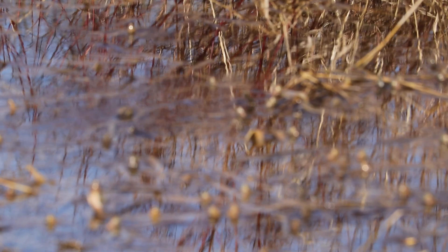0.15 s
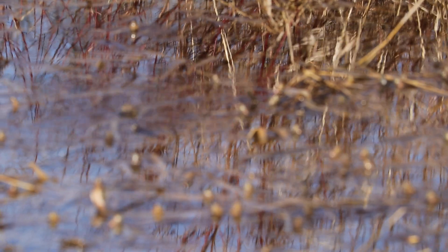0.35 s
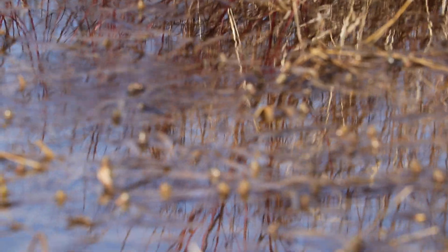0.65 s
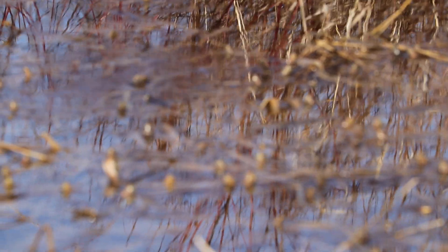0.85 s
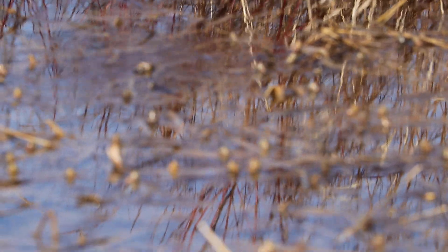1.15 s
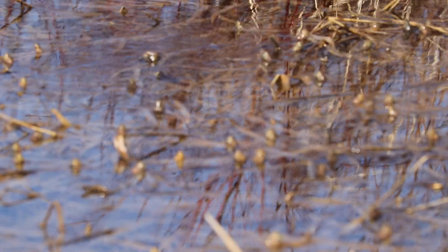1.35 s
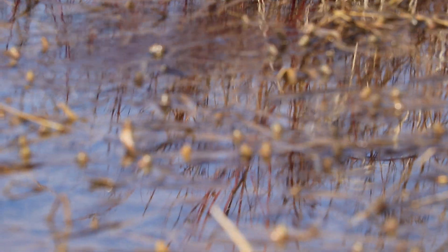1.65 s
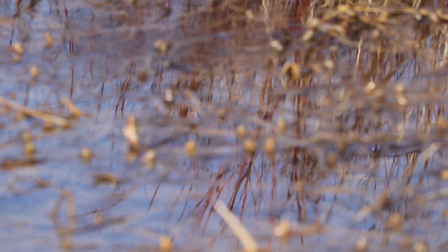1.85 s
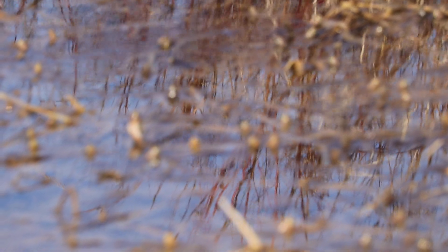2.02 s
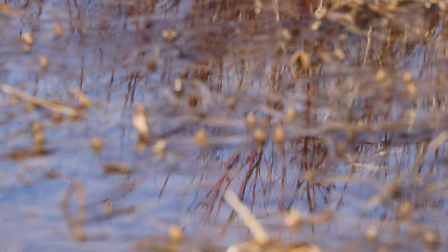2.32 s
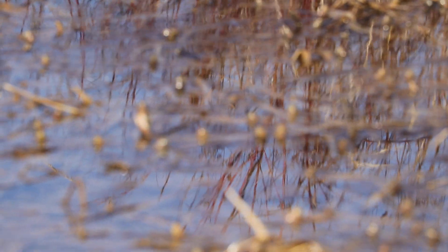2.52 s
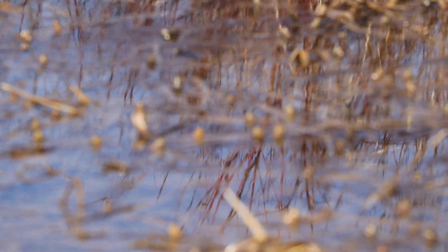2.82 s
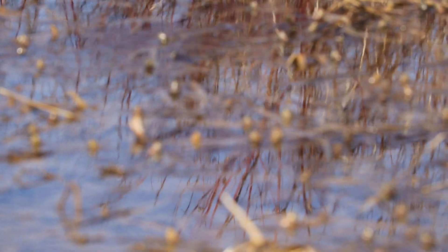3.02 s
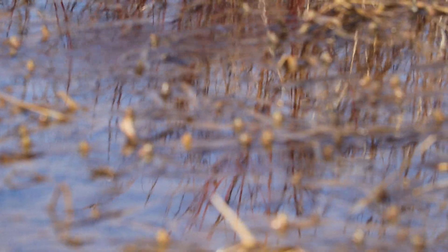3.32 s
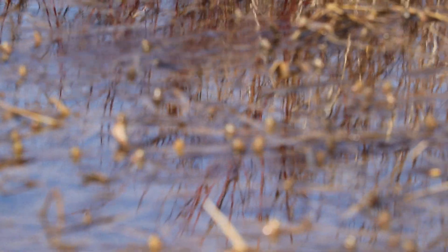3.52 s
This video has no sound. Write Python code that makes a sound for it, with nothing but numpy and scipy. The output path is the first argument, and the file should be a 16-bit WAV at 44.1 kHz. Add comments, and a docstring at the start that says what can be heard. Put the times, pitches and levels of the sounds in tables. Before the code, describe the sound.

A dense chorus of small frogs fills a shallow pond without pause: rapid, rising trills of tiny high pulses, the nearest sharp and loud, others blending behind; very faint distant bird clucks, outdoors, close stereo microphone.

```python
"""A dense chorus of small frogs trills over a shallow pond: each call is a comb of short tones rising in pitch.
The loudest pulses of near frogs stand out with noise and treble ticks; reeds and banks scatter the sound.
Far off one bird clucks in bell-shaped tones that arch in pitch, and another whistles in gliding sines.
Shaped noise gives light wind on the microphone ports and the hiss of open air; a faint sine hum comes and goes.
A limiter holds the peaks down, and the input stage bends slightly on them."""
import sys
import numpy as np
from scipy import signal
from scipy.fft import rfft, irfft, next_fast_len
from scipy.io import wavfile
from scipy.ndimage import uniform_filter1d, minimum_filter1d, map_coordinates

SR = 44100
rng = np.random.default_rng(int(sys.argv[2]) if len(sys.argv) > 2 else 0)


def transcribe(u):
    """Save the signal u as a 16-bit wav file named by the first command-line argument.

    u: samples, shape (n,) or (channels, n), limited to [-1, 1]; the rate is SR.
    q: integer samples, one column per channel.
    """
    v = np.clip(np.atleast_2d(u).T, -1, 1)
    q = np.round(v * 32767).astype(np.int16)
    wavfile.write(sys.argv[1], SR, q)


def voltage_ratio(level):
    """Linear amplitude factor for a level in decibels (scalar or array-like)."""
    return 10 ** (np.asarray(level, float) / 20)


N = 161847  # samples

# Loudest pulses of near frogs: [t/s, level/dB before NEAR_DB, f/Hz]
NEAR_PULSES = [(0.0313, -9, 3490), (0.0478, -6, 3660), (0.1406, -8, 3690), (0.161, -7, 3650),
               (0.1695, -5, 3490), (0.2663, -8, 3620), (0.2853, -9, 3660), (0.2987, -8, 3340),
               (0.3257, -10, 3280), (0.3351, -6, 3400), (0.4174, -6, 3590), (0.5043, -8, 3680),
               (0.5407, -9, 3590), (0.5901, -9, 3640), (0.6315, -7, 3540), (0.6883, -7, 3680),
               (0.7198, -8, 3070), (0.7637, -8, 3210), (0.7821, -6, 3260), (0.7996, -7, 3270),
               (0.8275, -7, 3530), (0.8754, -5, 3310), (0.9153, -9, 3360), (0.9343, -6, 3330),
               (0.9797, -6, 3340), (1.1298, -7, 3420), (1.1952, -8, 3510), (1.2396, -8, 3390),
               (1.255, -7, 3500), (1.279, -7, 3470), (1.2885, -7, 3550), (1.3229, -6, 3540),
               (1.3418, -5, 3370), (1.4331, -5, 3580), (1.5015, -6, 3280), (1.5309, -8, 3300),
               (1.5589, -7, 3350), (1.5783, -7, 3330), (1.6686, -7, 3350), (1.7345, -9, 3450),
               (1.7804, -6, 3640), (1.8208, -6, 3360), (1.8482, -9, 3430), (2.0004, -8, 3220),
               (2.0697, -8, 3600), (2.0697, -4, 3660), (2.169, -7, 3260), (2.1999, -7, 3500),
               (2.2139, -6, 3600), (2.3526, -8, 3320), (2.3605, -7, 3660), (2.384, -9, 3170),
               (2.4054, -7, 3640), (2.4922, -7, 3610), (2.5481, -6, 3460), (2.5686, -8, 3660),
               (2.601, -8, 3240), (2.6374, -7, 3170), (2.6668, -4, 3510), (2.7048, -8, 3480),
               (2.7531, -7, 3170), (2.797, -7, 3320), (2.8898, -6, 3090), (2.9018, -6, 3360),
               (3.0106, -9, 3530), (3.026, -6, 3560), (3.0704, -6, 3530), (3.0924, -8, 3530),
               (3.1507, -8, 3450), (3.1717, -7, 3610), (3.1921, -11, 3450), (3.2016, -8, 3430),
               (3.237, -7, 3300), (3.2545, -6, 3730), (3.275, -8, 3560), (3.2989, -8, 3710),
               (3.3413, -7, 3700), (3.4052, -9, 3210), (3.4376, -8, 3170), (3.5244, -9, 3270),
               (3.5678, -5, 3510), (3.5957, -9, 3110), (3.6112, -7, 3550), (3.6451, -8, 3270)]
# Partials of one pulse: [multiple of the pitch, level/dB, factor on the bell widths]
PULSE_PARTIALS = [(0.368, -34.5, 1.88), (0.428, -28.5, 1.7), (.52, -20.5, 1.166), (.66, -27.5, 0.97),
                  (.76, -30.5, 1.3), (1, 3, 0.88), (1.52, -21, 0.85), (2, -28.5, 0.79), (2.4, -40, .4)]
# Nominal bell widths before and after the peak, and delay of a near pulse's peak after its listed time
RISE_S, FALL_S, PEAK_AFTER_S = 0.00097, 0.00099, 0.0019
PARTIAL_SCATTER_DB, NEAR_DB = 2, -6  # scatter of the partials below 0 dB; offset of the near pulses
# Noise in every pulse, relative spectrum: [f/Hz, density level/dB]
RASP_SPECTRUM = [(3000, -28.5), (4500, 14), (6000, 8.5), (8000, -5.5), (12000, -16), (14500, -9),
                 (16000, -13.5)]
NEAR_RASP_DB = -51.5  # rms

# The crowd: one call, and how frogs differ
CALL_EVERY_S, PULSES_PER_S, RATE_LOG_SPREAD, JITTER_S = 1.15, 20, 0.15, 0.002
START_HZ, SIZE_SPREAD_HZ, CLIMB_HZ, PULSE_SCATTER_HZ = 3176.4, 227, 474, 68.6
SWELL_DB, PULSE_SCATTER_DB = 4.5, 0.79
MIDDLE_DB, MIDDLE_SPREAD_DB, FAR_DB = -22, 2, -21  # tone rms a few metres off, its spread; far shore
# Left minus right level, its change per unit of place, lag between the ports, scatter of near places
SIDE_DB, PAN_SPREAD_DB, PORT_LAG_S, NEAR_SPREAD = -3, 0.5, 4e-5, 0.62

# Decay of scatter off reeds and banks: [f/Hz, time to fall 60 dB/s]
REED_DECAY = [(500, 0.18), (3500, 0.41), (12000, 0.11)]
REEDS_DB, ECHO_SHARED = -4, 0.55  # echo level; share of one common tail mixed into both ports

# Treble ticks in the trills of the closest frogs: [t/s, level/dB before TICK_GAIN_DB]
TICK_EVENTS = [(0.0967, -47), (0.1176, -47), (0.1496, -47), (0.1695, -38), (0.194, -51), (0.2054, -48),
               (0.2628, -46), (0.3067, -45), (0.3197, -45), (0.3556, -48), (0.378, -48), (0.411, -49),
               (0.4439, -50), (0.4958, -50), (0.5402, -45), (0.5861, -48), (0.6255, -49), (0.6769, -49),
               (0.7806, -46), (0.8754, -45), (0.9333, -48), (0.9837, -47), (1.035, -46), (1.0894, -45),
               (1.1443, -48), (1.2785, -50), (1.3418, -43), (1.3982, -46), (1.4331, -44), (1.5319, -48),
               (1.7095, -46), (1.7399, -49), (1.7674, -46), (1.8582, -48), (1.9131, -47), (1.951, -50),
               (1.9654, -47), (1.9924, -50), (2.0068, -46), (2.0687, -43), (2.138, -44), (2.2204, -47),
               (2.4309, -47), (2.4917, -46), (2.5406, -45), (2.5656, -49), (2.6504, -48), (2.7087, -45),
               (2.7526, -49), (2.83, -47), (2.8903, -47), (3.247, -45), (3.2984, -47), (3.3503, -48),
               (3.3907, -49), (3.5673, -47)]
# Relative spectrum of a tick: [f/Hz, density level/dB]
TICK_SPECTRUM = [(3000, -38), (4500, 9), (7500, 3.5), (9000, 0.5), (12500, -3), (14500, 1.5), (16000, -3.5)]
# Likeness of the two sides in the ticks: [f/Hz, correlation]
TICK_ALIKE = [(5000, 0.62), (14000, 0.4)]
TICK_S, TICK_GAIN_DB = 0.001, -1  # bell width, also the delay of its peak

# Clucks of a far bird: [middle t/s, peak level/dB, nominal top f/Hz, factor on the length]
CLUCK_EVENTS = [(.465, -65, 735, 1), (.53, -53, 840, 0.79), (.592, -52, 895, 0.72), (.623, -52, 880, 0.41),
                (.973, -63.5, 754, 1.6), (1.03, -49.5, 825, 0.82), (1.088, -45, 970, 0.39),
                (1.122, -65, 920, 0.65), (1.16, -54, 1020, 0.82), (1.302, -57, 800, 1.6),
                (1.36, -56, 780, 0.52), (1.415, -48, 930, 0.64), (1.497, -60.5, 986, 1.8),
                (1.655, -56, 772, 2.1), (1.7, -58, 920, 1), (1.722, -58, 770, .8), (1.775, -46, 900, 0.65),
                (1.968, -54, 808, 1.8), (2.02, -52, 870, 0.68), (2.075, -51.5, 920, 0.71),
                (2.18, -57, 900, 1), (2.272, -52, 825, 1.5), (2.327, -51, 916, 0.61), (2.38, -55, 940, 1.2),
                (2.552, -57.5, 774, 1), (2.605, -53, 950, 0.65), (2.732, -53, 940, 0.86),
                (3.067, -47, 923, 0.55), (3.147, -47.5, 835, 0.93), (3.26, -50.5, 850, 0.66),
                (3.332, -52, 800, 0.75), (3.368, -48, 990, 0.91), (3.435, -46.5, 830, 0.54),
                (3.5, -50, 927, 1.6), (3.543, -43.5, 848, 1.3), (3.603, -51.5, 1010, 0.76)]
# The one partial of a cluck: [multiple of the nominal pitch, level/dB, factor on the bell widths]
CLUCK_PARTIAL = [(0.98, 0, 0.93)]
# Nominal bell widths, and share of the pitch lost one width from the peak
CLUCK_RISE_S, CLUCK_FALL_S, CLUCK_BEND = 0.008, 0.0063, 0.052
FAINT_CLUCK_DB, FAINT_CLUCK_HZ, FAINT_SPREAD_HZ = -61, 900, 100  # other cluckers, nominal pitch
# Whistles of a far songbird: [start t/s, length t/s, from f/Hz, to f/Hz, level/dB before flutter]
WHISTLE_EVENTS = [(.64, .09, 7080, 7000, -52), (1.159, .053, 5010, 5180, -42),
                  (1.222, .032, 7230, 5270, -51), (1.387, .058, 5020, 4940, -44),
                  (1.466, .026, 7270, 5200, -41), (1.61, .052, 4960, 4980, -46),
                  (1.68, .028, 7400, 5430, -48.5), (1.801, .06, 5020, 4800, -46),
                  (1.89, .035, 7330, 5200, -41)]

# Puffs of wind on the ports: [middle t/s, rms level/dB before wobble, bell width t/s]
WIND_PUFFS = [(0.102, -52.5, 0.032), (0.203, -46, 0.011), (0.294, -51, 0.047), (.66, -69.5, 0.031),
              (0.79, -56.5, 0.056), (1.283, -66, .015), (1.34, -48, 0.019), (2.556, -64.5, .03),
              (2.674, -53, 0.021), (2.763, -52, 0.012), (2.862, -57, 0.03), (3.03, -58.5, 0.064),
              (3.154, -63, 0.041), (3.468, -54, 0.018), (3.56, -64.5, 0.087)]
CALM_DB = -70.5  # wind rms between the puffs, before wobble
# Relative spectrum of the wind: [f/Hz, density level/dB]
WIND_SPECTRUM = [(15, -36), (25, -2), (60, 0.5), (130, -5), (325, -24.5), (520, -48), (880, -120)]
# Likeness of the two sides in the wind: [f/Hz, correlation]
WIND_ALIKE = [(40, 0.18), (200, 0.6)]
# Slow course of the hum, before wobble and port offsets: [t/s, rms level/dB]
HUM_LEVEL = [(0, -86), (.7, -97), (.76, -69), (1.25, -69.5), (1.3, -78), (1.42, -66.5), (2.2, -67),
             (2.26, -91), (2.34, -66.5), (3.05, -65.5), (3.14, -77), (3.24, -62.5), (3.6, -66.5),
             (3.67, -80)]
HUM_HZ = 130.4
# Relative spectrum of the open air: [f/Hz, density level/dB]
AIR_SPECTRUM = [(20, -12), (100, -14.5), (250, -8), (550, -10.5), (1050, -7.5), (1300, 8.5), (2300, 10.5),
                (4500, 11), (8000, -11.5), (12000, -22), (14500, -17.5), (16000, -22)]
AIR_DB = -40.5  # rms
# Likeness of the two sides in the open air and the rasp: [f/Hz, correlation]
AIR_SIDES_ALIKE = [(250, 0.23), (1200, .9), (4000, 0.68), (12000, 0.23)]

LIMIT_DB, LIMIT_S, BEND = -3.5, 0.003, 0.042  # limiter threshold and window; cubic share of the input stage


def unit(x):
    """Energy normalization: scales a signal to rms 1."""
    return x / np.sqrt(np.mean(x ** 2) + 1e-20)


def along(points, hz):
    """Logarithmic frequency scale: interpolates (f/Hz, value) points on it."""
    f, value = np.transpose(points)
    return np.interp(np.log(hz + 1), np.log(f + 1), value)


def wobble(rate):
    """Slow randomness: a smooth curve through random knots, rate of them a second."""
    knots = rng.standard_normal(int(N * rate / SR) + 4)
    return map_coordinates(knots, [np.arange(N) * rate / SR])


def rush(spectrum, alike):
    """Spectral shaping: stereo noise of rms 1, its sides correlated through shares of mid and side."""
    m = next_fast_len(N + 8192)
    hz = np.fft.rfftfreq(m, 1 / SR)
    turn = np.arccos(np.clip(along(alike, hz), 0, 1)) / 2
    noise = rfft(rng.standard_normal((2, m))) * voltage_ratio(along(spectrum, hz))
    mid, side = irfft(noise * [np.cos(turn), np.sin(turn)], m)[:, :N]
    return unit(np.array([mid + side, mid - side]))


def bursts(s, db, width_s):
    """Amplitude modulation: an envelope of short bells at times s."""
    at = np.clip(np.round(s * SR).astype(int), 0, N - 1)
    t = np.arange(-300, 301) / SR
    bell = np.exp(-(t / width_s) ** 2 / 2)
    return np.convolve(np.bincount(at, voltage_ratio(db), N), bell, "same")


def blips(s, db, hz, place, partials, rise_s, fall_s, side_db, bend=0, stretch=1):
    """Additive synthesis: bell-shaped tones peak at times s; place sets level and lag between the ports."""
    longest = 3.5 * SR * np.max(stretch) * max(p[2] for p in partials)
    before, after = int(longest * rise_s) + 40, int(longest * fall_s) + 40
    at = np.round(s * SR).astype(int)[:, None] + np.arange(-before, after)
    inside = (at >= 0) & (at < N)
    chance = rng.standard_normal((len(s), 2 * len(partials)))
    out = np.zeros((2, N))
    for ch, sign in enumerate((0.5, -0.5)):
        t = at / SR - (s + sign * place * PORT_LAG_S)[:, None]
        wave = 0
        for k, (multiple, level_db, length) in enumerate(partials):
            u = t / np.where(t < 0, rise_s, fall_s) / (length * stretch)  # time in bell widths
            scatter_db = PARTIAL_SCATTER_DB * chance[:, 2 * k, None] * (level_db < 0)
            arched_t = t * (1 - bend * u ** 2 / 3)  # the pitch falls as u squared on both sides
            phase = 2 * np.pi * multiple * hz[:, None] * arched_t + 9 * chance[:, 2 * k + 1, None]
            wave = wave + voltage_ratio(level_db + scatter_db) * np.exp(-u ** 2 / 2) * np.sin(phase)
        wave = wave * voltage_ratio(db + sign * (side_db - PAN_SPREAD_DB * place))[:, None]
        out[ch] = np.bincount(at[inside], wave[inside], N)
    return out


def crowd(spread_db, rasp_db, count, size=12):
    """Superposition of many sources: frogs of mixed sizes repeat trills of swelling, climbing tones at rms 1."""
    frog = rng.standard_normal((count, 4, 1, 1))
    first = (np.arange(count) + rng.random(count))[:, None, None] / count - 1  # turns, in calls
    # golden-ratio steps mix the sizes evenly over -1..1
    body = 2 * ((np.arange(count) * (np.sqrt(5) - 1) / 2 + rng.random()) % 1)[:, None, None] - 1
    call, step = np.arange(5)[:, None], np.arange(size)
    progress = step / (size - 1)
    s = (first + call) * CALL_EVERY_S + step / (PULSES_PER_S * np.exp(RATE_LOG_SPREAD * frog[:, 0]))
    s = s + JITTER_S * rng.standard_normal(s.shape)
    hz = START_HZ + SIZE_SPREAD_HZ * body + CLIMB_HZ * progress
    hz = hz + PULSE_SCATTER_HZ * rng.standard_normal(s.shape)
    db = spread_db * frog[:, 2] + SWELL_DB * progress + PULSE_SCATTER_DB * rng.standard_normal(s.shape)
    place = frog[:, 3] + 0 * s
    heard = (s > -0.01) & (s < N / SR + 0.01)
    s, db, hz, place = s[heard], db[heard], hz[heard], place[heard]
    rasp = bursts(s, db, RISE_S) * rush(RASP_SPECTRUM, AIR_SIDES_ALIKE)
    tones = blips(s, db, hz, place, PULSE_PARTIALS, RISE_S, FALL_S, SIDE_DB)
    return voltage_ratio(rasp_db) * unit(rasp) + unit(tones)


def reeds(x, size=8192):
    """Diffuse scattering: decaying noise tails, drawn anew for each overlapping window, echo the sound."""
    out = np.zeros((2, N + SR))
    padded = np.pad(x, ((0, 0), (size, size)))
    for start in range(-size // 2, N, size // 2):
        hz, t, z = signal.stft(rng.standard_normal((3, SR // 5)), SR, nperseg=256)
        decay = voltage_ratio(-60 * t / along(REED_DECAY, hz)[:, None])
        tail = signal.istft(z * decay, SR, nperseg=256)[1]
        tail = ECHO_SHARED * tail[2] + (1 - ECHO_SHARED) * tail[:2]
        piece = padded[:, start + size:start + 2 * size] * signal.get_window("hann", size)
        echo = signal.fftconvolve(piece, tail / np.linalg.norm(tail[0]), axes=1)
        out[:, start + size:start + size + echo.shape[1]] += echo
    return out[:, size:size + N]


def wind():
    """Turbulent pressure: low noise swells in bell-shaped puffs and wobbles separately at each port."""
    t = np.arange(N) / SR
    puffs = sum(voltage_ratio(db) * np.exp(-((t - s) / width) ** 2 / 2) for s, db, width in WIND_PUFFS)
    flutter = voltage_ratio(2.0 * np.array([wobble(17), wobble(25)]))
    return (voltage_ratio(CALM_DB) + puffs) * flutter * rush(WIND_SPECTRUM, WIND_ALIKE)


def hum():
    """Simple harmonic oscillation: one sine of slowly varying level, stronger at the right port."""
    t = np.arange(N) / SR
    level_db = np.interp(t, *np.transpose(HUM_LEVEL)) + 0.8 * wobble(8.7)
    tone = voltage_ratio(level_db) * np.sqrt(2) * np.sin(2 * np.pi * HUM_HZ * t)
    return tone * voltage_ratio([[-2.5], [1.5]])


def open_air():
    """Broadband noise: a steady hiss with the spectrum of the open air."""
    return voltage_ratio(AIR_DB) * rush(AIR_SPECTRUM, AIR_SIDES_ALIKE)


def near_pulses():
    """Additive partials with modulated noise: the near frogs' pulses that stand out of the crowd."""
    s, db, hz = np.transpose(NEAR_PULSES)
    peak_s = s + PEAK_AFTER_S
    place = NEAR_SPREAD * rng.standard_normal(len(s))
    tones = blips(peak_s, db + NEAR_DB, hz, place, PULSE_PARTIALS, RISE_S, FALL_S, SIDE_DB)
    rasp = bursts(peak_s, db, RISE_S) * rush(RASP_SPECTRUM, AIR_SIDES_ALIKE)
    return tones + voltage_ratio(NEAR_RASP_DB) * unit(rasp)


def faint_clucks():
    """Random superposition: 60 faint arched tones at chance times, from cluckers farther still."""
    luck = rng.standard_normal((60, 2))
    s = rng.uniform(0, N / SR, 60)
    db = FAINT_CLUCK_DB + 3 * luck[:, 0]
    hz = FAINT_CLUCK_HZ + FAINT_SPREAD_HZ * luck[:, 1]
    return blips(s, db, hz, np.zeros(60), CLUCK_PARTIAL, CLUCK_RISE_S, CLUCK_FALL_S,
                 side_db=-0.3, bend=CLUCK_BEND)


def treble_ticks():
    """Amplitude-modulated noise: wide treble ticks in the trills of the closest frogs."""
    s, db = np.transpose(TICK_EVENTS)
    return bursts(s + TICK_S, db + TICK_GAIN_DB, TICK_S) * rush(TICK_SPECTRUM, TICK_ALIKE)


def clucks():
    """Frequency modulation: a far bird's low tones arch in pitch under a bell envelope."""
    s, db, hz, longer = np.transpose(CLUCK_EVENTS)
    return blips(s, db, hz, 0 * s, CLUCK_PARTIAL, CLUCK_RISE_S, CLUCK_FALL_S,
                 side_db=0.0, bend=CLUCK_BEND, stretch=longer[:, None])


def whistles():
    """Phase as the integral of frequency: thin sines glide linearly in pitch and flutter in level."""
    out = np.zeros((2, N))
    for start, length, from_hz, to_hz, level_db in WHISTLE_EVENTS:
        n = int(length * SR)
        phase = 2 * np.pi * np.cumsum(np.linspace(from_hz, to_hz, n)) / SR
        envelope = np.sin(np.pi * np.arange(n) / n) ** 0.37
        level = voltage_ratio(level_db + 6.2 * wobble(90)[:n])
        out[:, int(start * SR):][:, :n] += level * np.sin(phase) * envelope
    return out


def scene():
    """Superposition: near and middle frogs and birds with their echo, then the far shore and background."""
    near = near_pulses() + treble_ticks()
    middle = voltage_ratio(MIDDLE_DB) * crowd(MIDDLE_SPREAD_DB, rasp_db=-27, count=26)
    birds = clucks() + faint_clucks() + whistles()
    echoing = near + middle + birds
    echo = voltage_ratio(REEDS_DB) * reeds(echoing)
    far = voltage_ratio(FAR_DB) * crowd(1.0, rasp_db=-30.5, count=34)
    return echoing + echo + far + wind() + hum() + open_air()


def band_limit(x):
    """A steep low-pass at the top of the band."""
    return signal.sosfilt(signal.butter(12, 16460, fs=SR, output="sos"), x)


def record(dry):
    """Nonlinear transfer: a fast limiter eases the peaks, a cubic bends them and a low-pass cuts the top."""
    span = int(LIMIT_S * SR)
    # the power 0.6 takes off only part of the excess
    gain = np.minimum(1, voltage_ratio(LIMIT_DB) / (np.abs(dry).max(0) + 1e-9)) ** 0.6
    held = dry * uniform_filter1d(minimum_filter1d(gain, span), span)
    bent = held - BEND * held ** 3
    low_pass = signal.ellip(12, 0.3, 80, 15800, fs=SR, output="sos")
    mix = signal.sosfilt(low_pass, bent)
    return band_limit(mix)


dry = scene()
out = record(dry)
transcribe(out)
```